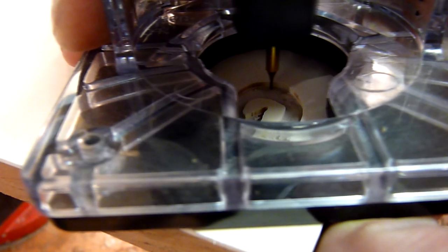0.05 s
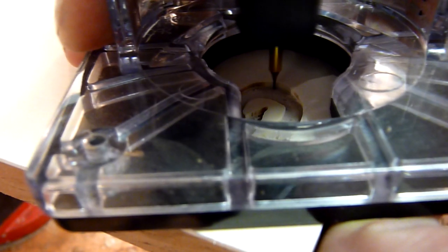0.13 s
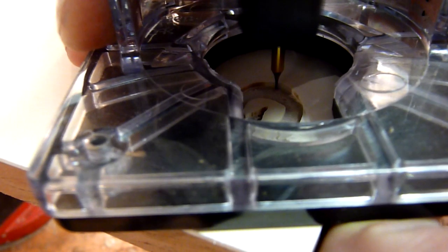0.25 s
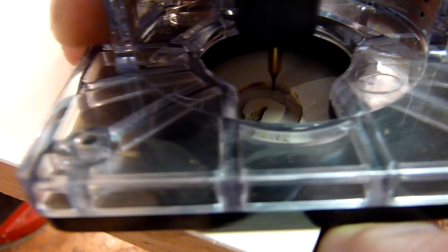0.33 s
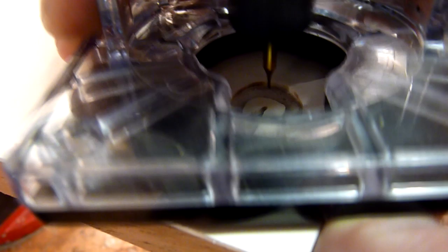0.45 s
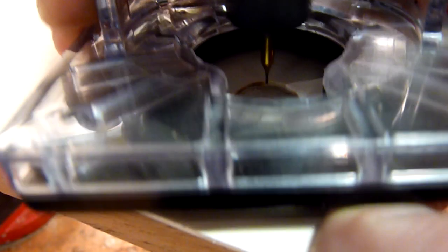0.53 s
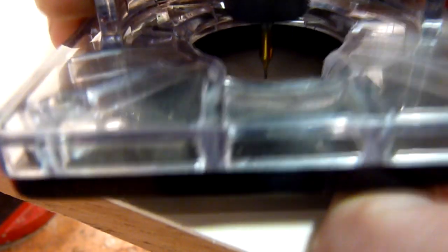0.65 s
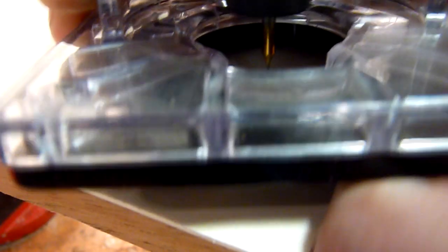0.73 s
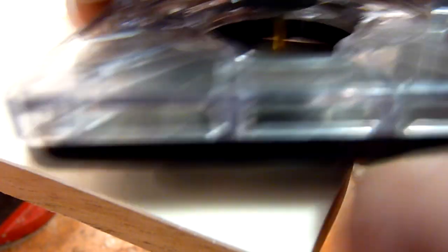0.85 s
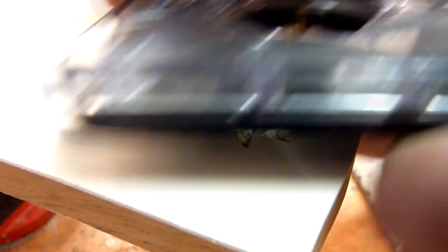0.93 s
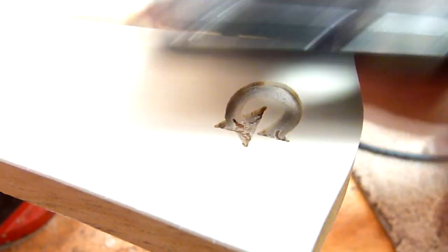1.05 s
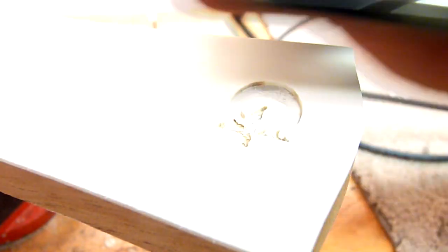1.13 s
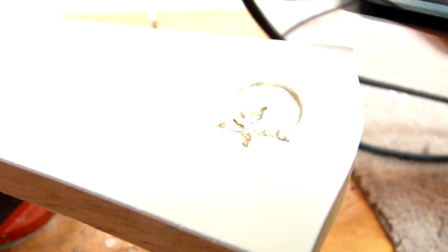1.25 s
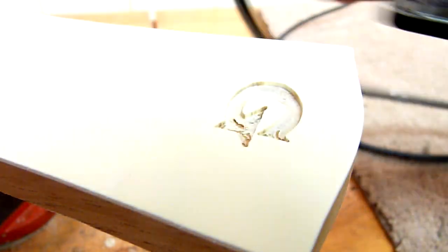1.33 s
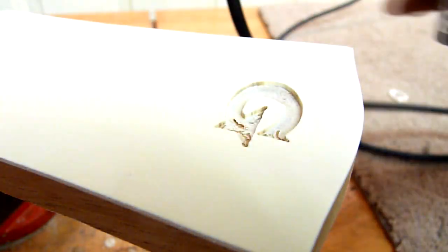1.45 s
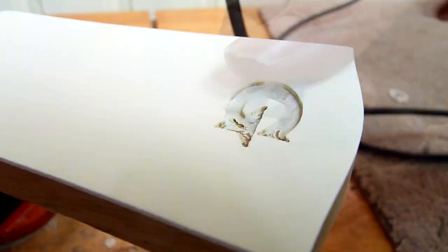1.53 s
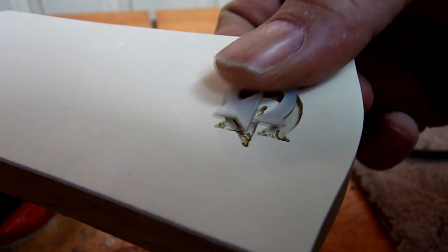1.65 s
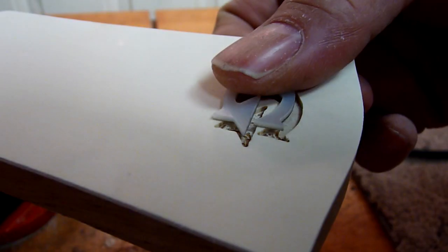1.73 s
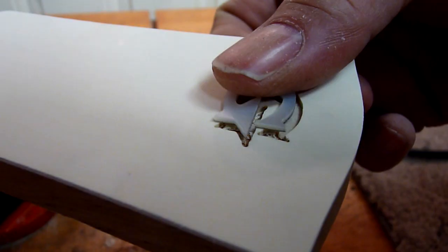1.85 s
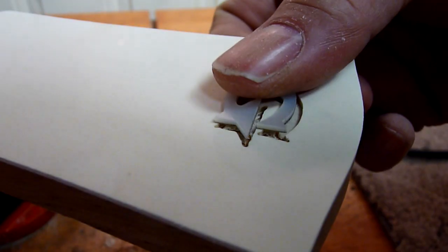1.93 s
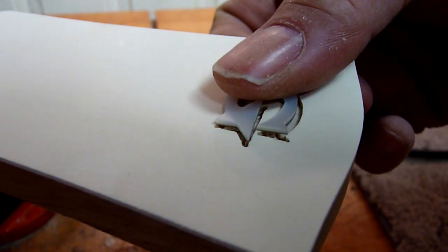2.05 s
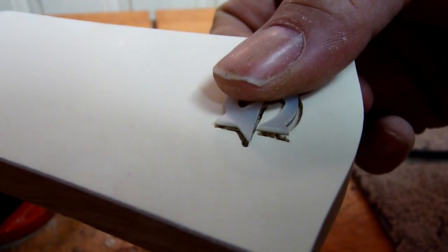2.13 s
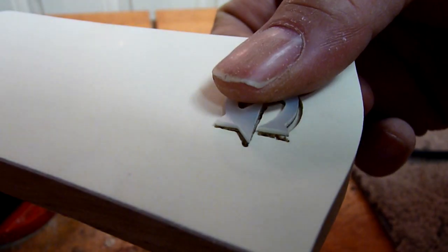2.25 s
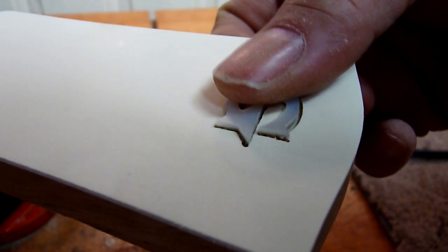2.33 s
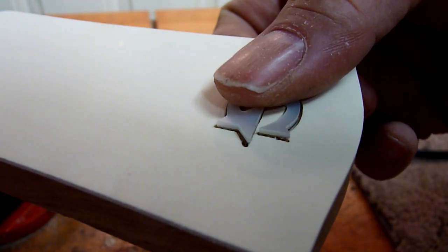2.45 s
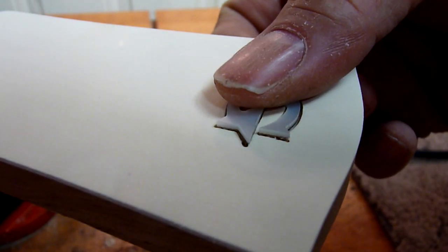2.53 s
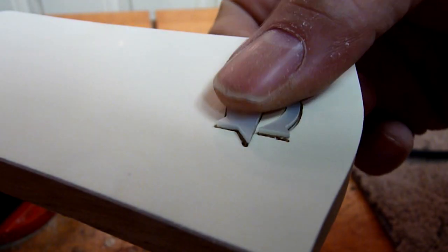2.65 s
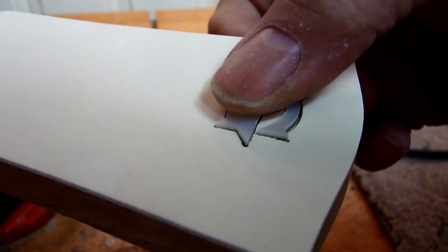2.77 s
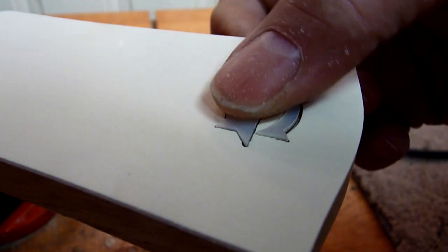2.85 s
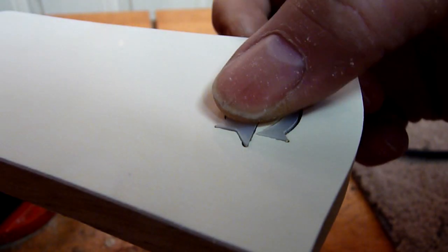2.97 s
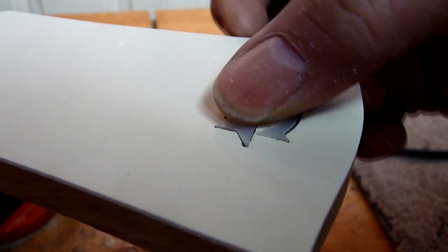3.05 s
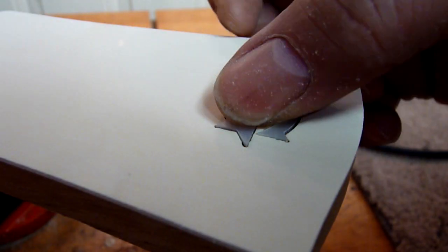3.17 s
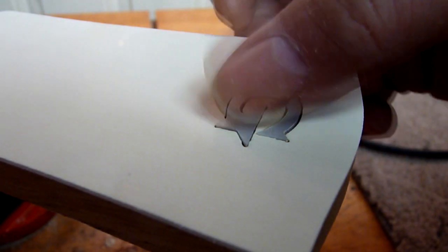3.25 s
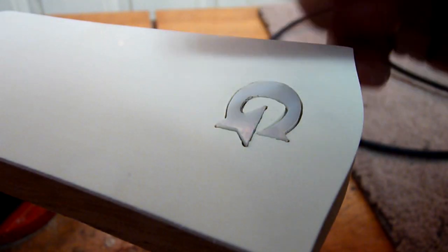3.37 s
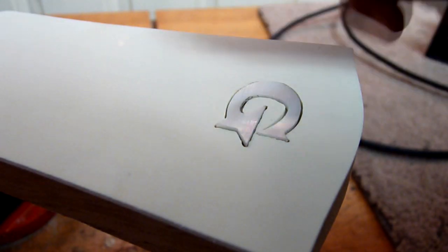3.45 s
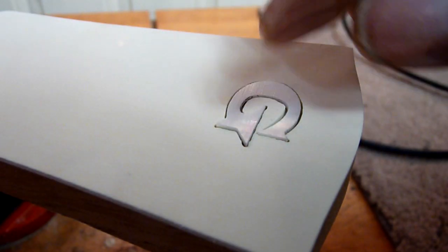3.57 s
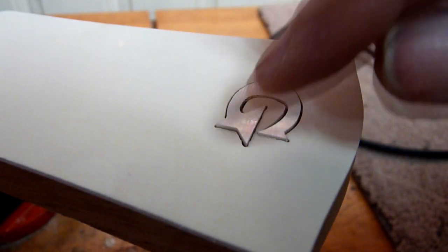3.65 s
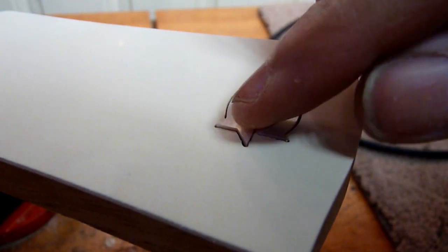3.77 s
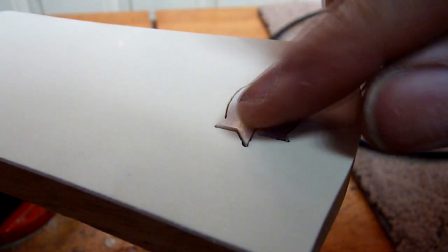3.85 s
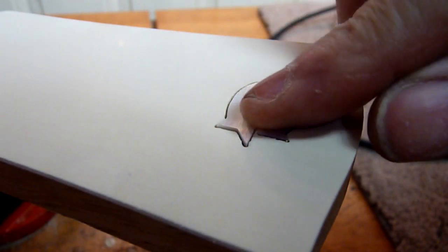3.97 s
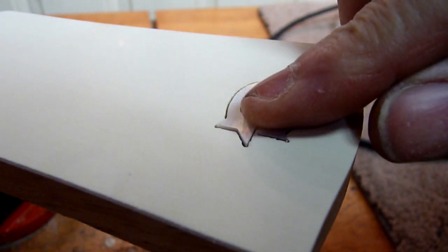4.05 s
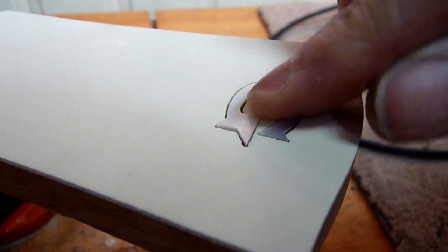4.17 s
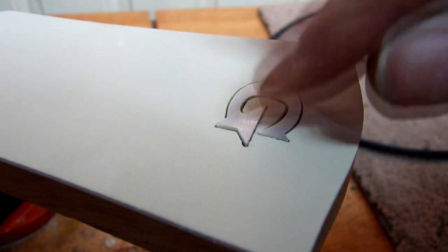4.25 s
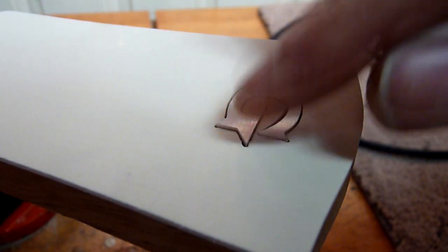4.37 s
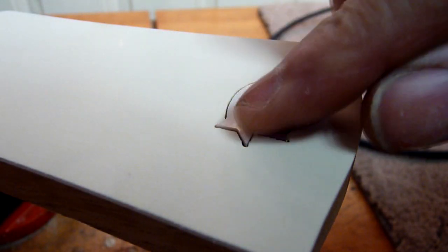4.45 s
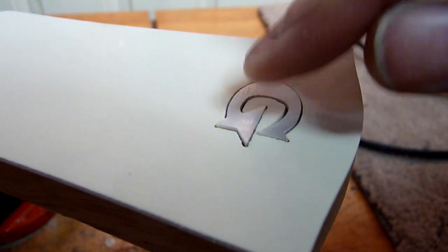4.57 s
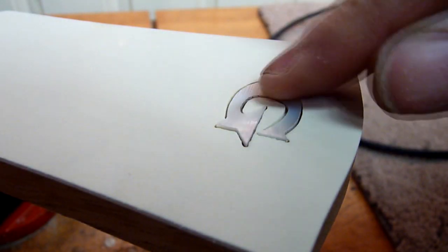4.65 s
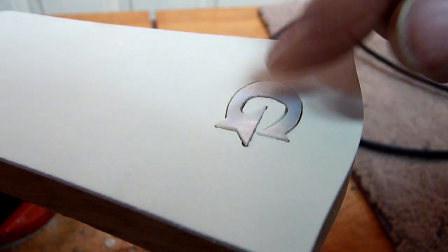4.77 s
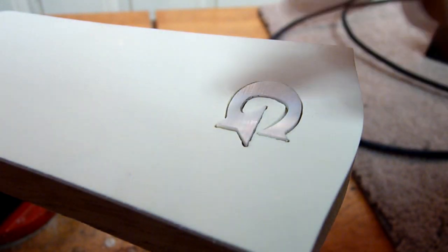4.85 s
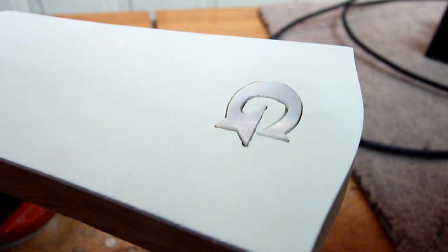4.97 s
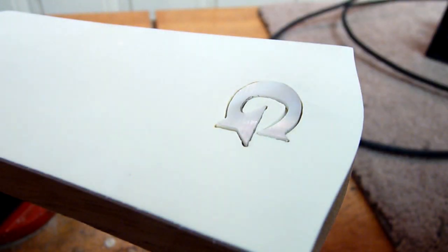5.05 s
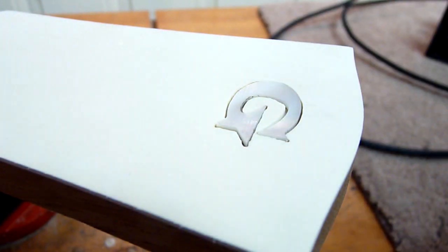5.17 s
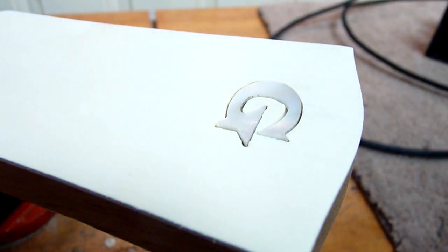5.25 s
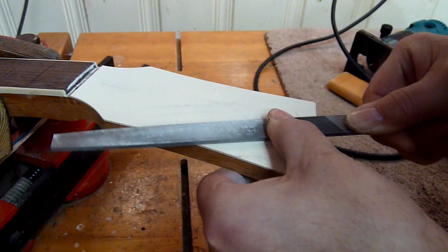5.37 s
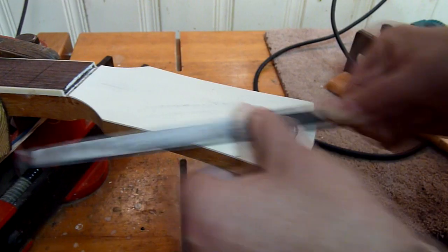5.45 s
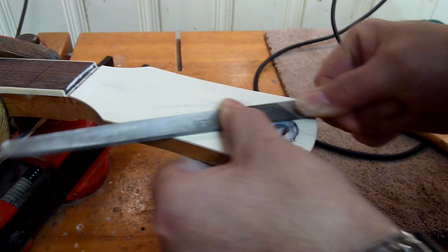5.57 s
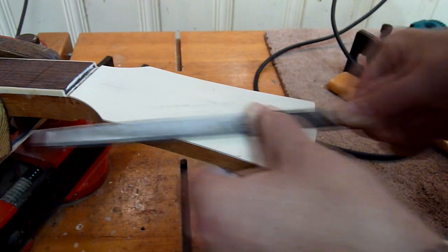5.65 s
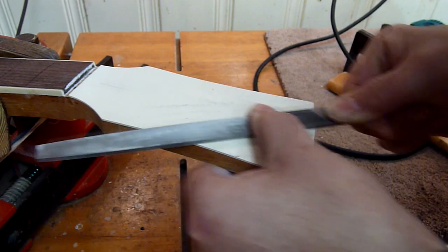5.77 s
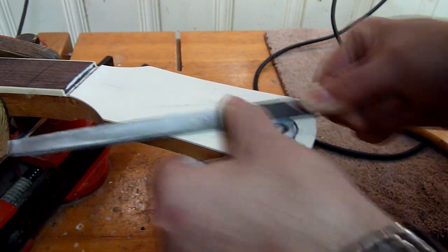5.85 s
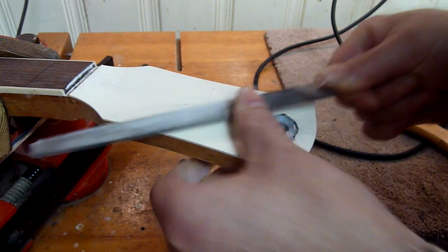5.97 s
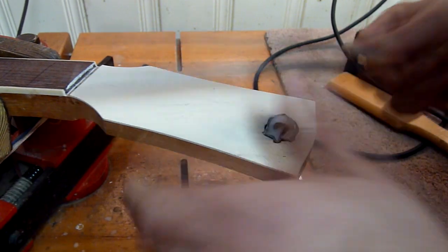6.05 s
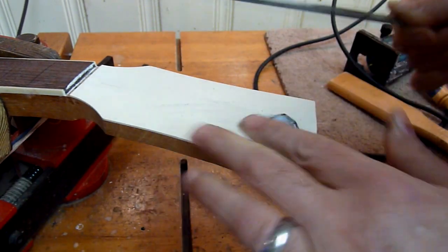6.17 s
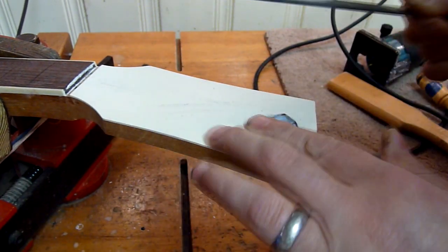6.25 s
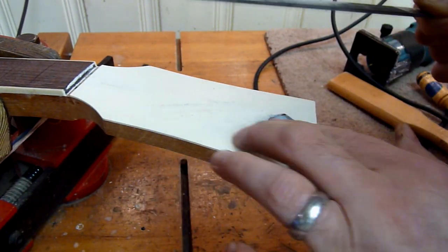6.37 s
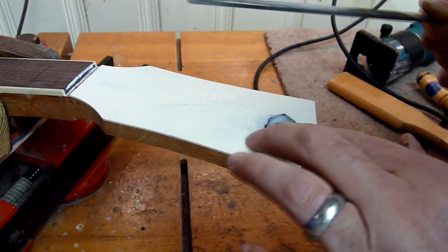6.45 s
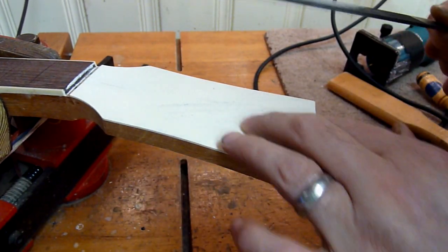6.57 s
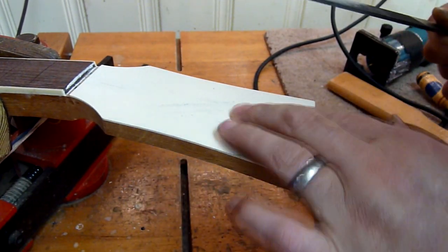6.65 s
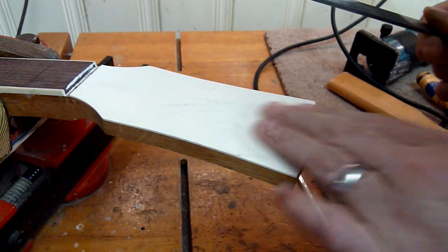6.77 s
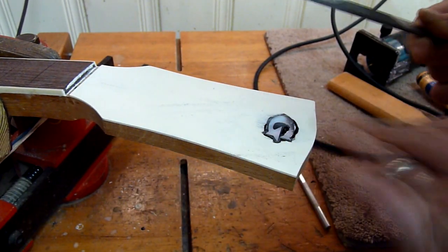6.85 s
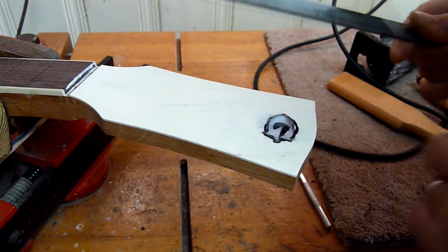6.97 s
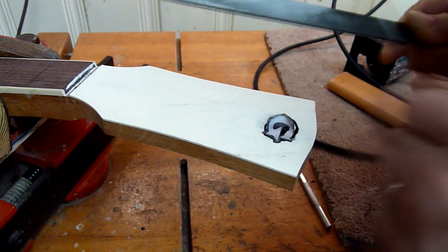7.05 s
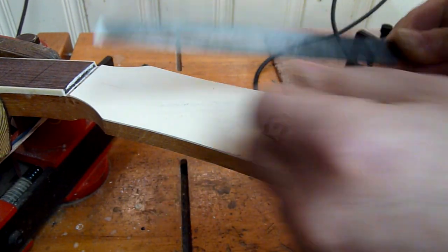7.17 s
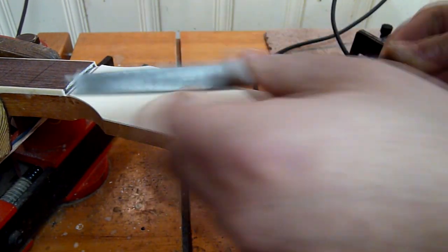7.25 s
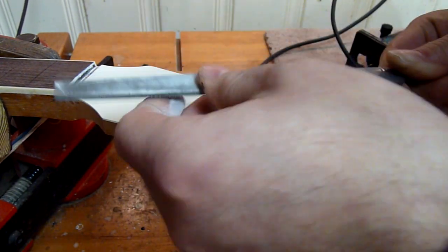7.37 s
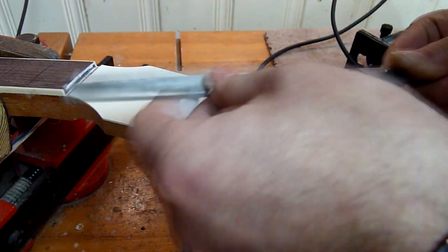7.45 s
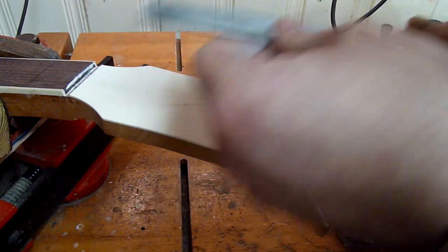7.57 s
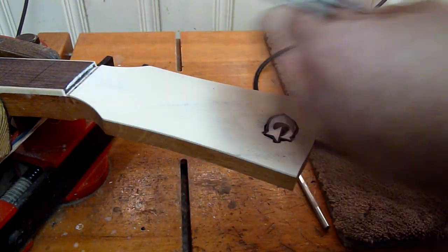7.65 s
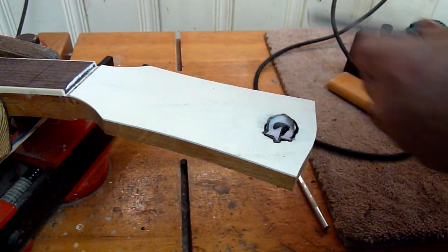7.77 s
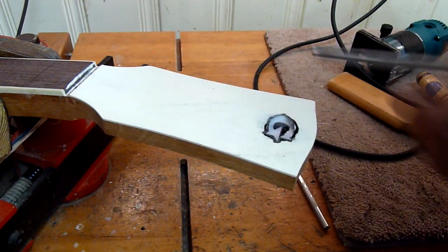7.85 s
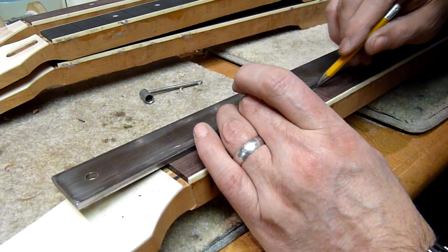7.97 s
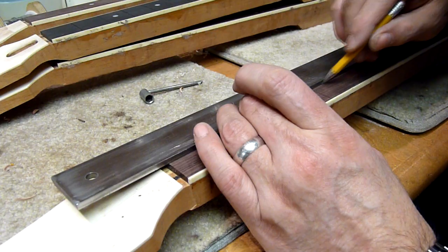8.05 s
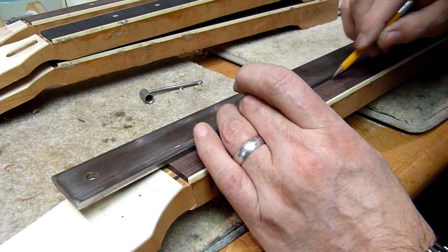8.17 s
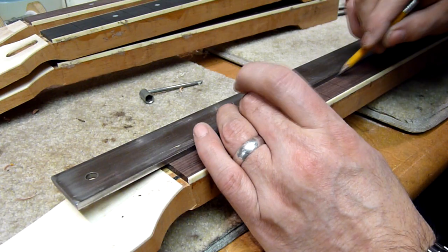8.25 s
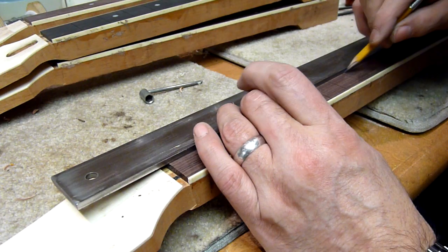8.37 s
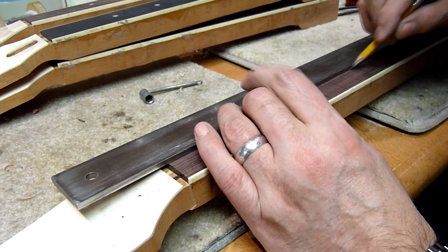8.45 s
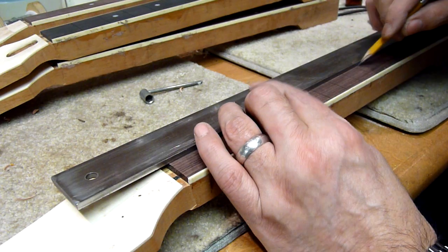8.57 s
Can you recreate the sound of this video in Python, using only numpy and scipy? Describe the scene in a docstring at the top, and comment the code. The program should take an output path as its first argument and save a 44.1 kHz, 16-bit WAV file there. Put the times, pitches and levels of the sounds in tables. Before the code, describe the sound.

Loud steady router whine and airy roar fade fast, followed by inlay clicks, soft rubbing, a few quick file rasps and faint handling knocks on wood.

```python
"""A small workshop in stereo, with hiss that is alike in the two microphones in the lows and mids but unrelated
in the treble, over low rumble and mains hum. First a small router whines on the wood, is lifted, moves right
and fades quickly; its motor coasts down. Then a thumb presses an inlay home with small clicks, made of noise
bursts and decaying modes; fingers slide over wood as soft hiss, a file takes strokes, a hand lightly brushes
the wood, and a pencil scratches once. The camera samples at 16 kHz, so the treble is mirrored, and it notches
out a few fixed bands."""
import sys
import numpy as np
from scipy import signal
from scipy.fft import rfft, irfft, next_fast_len
from scipy.io import wavfile
from scipy.ndimage import uniform_filter1d

SR = 44100
rng = np.random.default_rng(int(sys.argv[2]) if len(sys.argv) > 2 else 0)


def linear_from_db(decibels):
    """Turn decibels (scalar or array-like) into linear amplitude factors; 0 gives 1."""
    return 10 ** (np.asarray(decibels, float) / 20)


def transcribe(signal):
    """Save signal, clipped to [-1, 1], as a 16-bit WAV file at the path in sys.argv[1]."""
    frames = np.atleast_2d(signal).T
    limited = np.clip(frames, -1, 1)
    pcm = np.round(limited * 32767).astype(np.int16)
    wavfile.write(sys.argv[1], SR, pcm)


N = 379701
T = np.arange(N) / SR  # s


def evened(x):
    """Scales to an rms of one."""
    return x / np.sqrt(np.mean(x ** 2) + 1e-20)


def read(points, hz):
    """Reads a spectrum table on a log-frequency axis."""
    f, value = np.transpose(points)
    return np.interp(np.log(hz + 1), np.log(f + 1), value)


def curves(rows):
    """Columns of a table, joined by straight lines in time."""
    s, *columns = np.transpose(rows)
    return [np.interp(T, s, c) for c in columns]


def gate(rows, edge_s):
    """One while a table lasts, with soft edges."""
    inside = 1. * ((T > rows[0][0]) & (T < rows[-1][0]))
    return uniform_filter1d(inside, max(int(edge_s * SR), 1), mode="nearest")


def arch(start, length, share, power):
    """Swells from nothing to one at a share of the length, then sinks back."""
    top = start + np.clip(share, .02, .98) * length
    u = np.interp(T, [start, top, start + length], [0, .5, 1])
    return np.abs(np.sin(np.pi * u)) ** power * (u < 1)


def colour(x, points):
    """Filters by a spectrum table."""
    size = next_fast_len(N)
    gain = linear_from_db(read(points, np.fft.rfftfreq(size, 1 / SR)))
    return irfft(rfft(x, size) * gain, size)[..., :N]


def noise(points, same, patchy_db, lead=((1, 0), (2, 0))):
    """Two-channel noise in drifting patches; the channels are alike as far as the table says."""
    hz = np.fft.rfftfreq(1024, 1 / SR)
    a, b, c, d, patches = rng.standard_normal((N // 256 + 5, 513, 5)).T
    patches = evened(uniform_filter1d(uniform_filter1d(patches, 8, 0), 8, 1))
    like = np.clip(read(same, hz), -1, 1)[:, None]
    late = np.exp(-1j * read(lead, hz))[:, None]
    left = a + 1j * b
    right = like * late * left + np.sqrt(1 - like ** 2) * (c + 1j * d)
    z = np.array([left, right]) * linear_from_db(read(points, hz)[:, None] + patchy_db * patches)
    return evened(signal.istft(z, nperseg=1024, noverlap=768)[1][:, :N])


def resonate(x, hz, width):
    """Shifts the curve hz down to zero, smooths, and shifts back."""
    turn = np.exp(2j * np.pi * np.cumsum(hz * np.ones(N)) / SR)
    r = np.exp(-np.pi * width / SR)
    return evened((turn * signal.lfilter([1 - r], [1, -r], x / turn)).real)


def panned(x, db):
    """Shares a left-right level difference between the channels."""
    return x * linear_from_db(np.array([db / 2, -db / 2]).reshape(2, -1))


# shop background, steady in each stretch: (start [s], rumble [dB], hiss [dB], hum change [dB])
SHOP_STRETCHES = [(1.62, -55.5, -65, 0), (5.418, -52.5, -65, -1), (8.055, -55, -62, 0)]
# spectrum of the shop's rumble: (frequency [Hz], density [dB per Hz])
SHOP_RUMBLE = [(20, -49), (35, -23.5), (55, -12.5), (100, -2.5), (150, -12.5), (250, -5.5), (350, -12),
               (600, -17.5), (1000, -19), (1500, -26), (2300, -36), (3200, -59.5)]
# spectrum of the microphone hiss: (frequency [Hz], density [dB per Hz])
MICROPHONE_HISS = [(300, -3.5), (1000, 5.5), (2000, -4.5), (3500, -4), (5000, -6), (6500, -8.5),
                   (8000, -6.5), (9000, -36.5)]
# mains hum, before waver and stretch: (frequency [Hz], level [dB])
MAINS_HUM = [(59.6, -67), (119.5, -63)]
# left-right likeness of the shop: (frequency [Hz], likeness [-1 to 1])
SHOP_LIKENESS = [(120, .9995), (270, .99), (560, .93), (1180, .78), (2500, 0), (6000, -.05)]


def shop():
    """Low rumble and mains hum, nearly alike in both channels, under microphone hiss that is alike in the lows
    and mids and unrelated in the treble."""
    fade_s, dip_s = .12, .004
    start, *levels = np.transpose(SHOP_STRETCHES)
    stretch = np.maximum(np.searchsorted(start, T) - 1, 0)
    rumble_db, hiss_db, hum_db = (uniform_filter1d(db[stretch], 800) for db in levels)
    waver = rng.standard_normal((len(MAINS_HUM), N))
    waver = evened(uniform_filter1d(uniform_filter1d(waver, 6000), 6000))
    hum = sum(np.sqrt(2) * linear_from_db(db + 3.5 * w) * np.sin(2 * np.pi * hz * T + .4 * w)
              for (hz, db), w in zip(MAINS_HUM, waver))
    fade_in = np.clip(1 + (T - start[0]) / fade_s, 0, 1) ** 2.5
    # the background dips briefly where one stretch gives way to the next
    dips = np.prod([1 - 0.73 * np.exp(-((T - s) / dip_s) ** 2) for s in start[1:]], axis=0)
    rumble = linear_from_db(rumble_db) * noise(SHOP_RUMBLE, SHOP_LIKENESS, patchy_db=2.0)
    hiss = linear_from_db(hiss_db) * noise(MICROPHONE_HISS, SHOP_LIKENESS, patchy_db=1.5)
    return fade_in * dips * (rumble + linear_from_db(hum_db) * hum + hiss)


# finger slides on wood and, at 8.38 s, a short pencil scratch: (start [s], length [s],
# share of the length until the top [0-1], top level [dB], extra treble from a lighter touch [dB])
SLIDES_AND_SCRATCH = [(4.197, 0.122, .4, -62, 11), (4.55, 0.096, 0.36, -60.5, 6),
                      (4.79, .06, .35, -67, -3.5), (4.98, 0.41, 0.46, -54, 2.5),
                      (7.315, 0.057, 0.74, -64, 0), (7.917, .13, 0.94, -62.5, 3.5),
                      (8.383, 0.08, 0.43, -66.5, 5)]
# spectrum of slides and scratch: (frequency [Hz], density [dB per Hz])
SLIDE_SPECTRUM = [(500, 9), (1200, 6), (2500, -0.5), (4000, 2.5), (6000, 3.5), (7500, -2.5), (8500, -6),
                  (9500, -30)]
# left-right likeness of slides, motor and router: (frequency [Hz], likeness [-1 to 1])
TOOL_LIKENESS = [(300, .9995), (600, .99), (1200, .96), (2500, .82), (5000, .85), (9000, .72)]


def slides_and_scratch():
    """Fingers slide on wood, and a pencil scratches once: soft, even friction hiss."""
    friction = noise(SLIDE_SPECTRUM, TOOL_LIKENESS, patchy_db=1.2)
    treble = signal.sosfilt(signal.butter(4, 5500, "high", fs=SR, output="sos"), friction)
    return sum(arch(*when, power=1) * linear_from_db(db) * (friction + (linear_from_db(extra_db) - 1) * treble)
               for *when, db, extra_db in SLIDES_AND_SCRATCH)


def bench(x, wet_db, t60):
    """Near reflections that differ per microphone port, more so in the treble."""
    t = np.arange(SR // 4) / SR
    sparse = rng.standard_normal((2, len(t))) * (rng.random((2, len(t))) < .06)
    tail = sparse * linear_from_db(-60 * t / t60) * (t > .0008)
    tail = signal.lfilter(*signal.butter(1, 1800, "high", fs=SR), tail)
    tail = tail / np.linalg.norm(tail[0])
    return x + linear_from_db(wet_db) * signal.fftconvolve(x, tail, axes=1)[:, :N]


# taps: (time [s], crack level [dB], knock level [dB], best-excited knock [Hz], best-excited crack [Hz])
TAP_EVENTS = [(2.4448, -34.5, -31, 900, 6030), (2.8215, -40, -45, 1450, 4300),
              (2.8701, -46.5, -36, 646, 3770), (3.34, -52, -54, 773, 4200), (4.4836, -50, -42, 650, 3450),
              (4.7116, -37, -42, 680, 4160), (5.3838, -75, -43.5, 597, 3740), (5.4246, -34, -39, 571, 6400),
              (6.044, -41, -48, 970, 6800), (6.0936, -36.5, -57, 660, 7700), (6.1942, -46, -56, 552, 3890),
              (6.2603, -43.5, -52, 624, 3680), (6.2991, -45, -57, 861, 3210), (6.4667, -54, -53, 743, 6300),
              (6.5782, -56, -56, 910, 5850), (6.9078, -37, -42, 2200, 5950), (6.9748, -49, -59, 915, 3080),
              (8.2166, -39, -46, 1420, 4170), (8.4253, -53, -47.5, 1780, 5960)]
# knock modes of the board: (frequency [Hz], level [dB], decay by 60 dB [s])
KNOCK_MODES = [(620, -2, .045), (975, -5, .1), (1420, -2, .045), (1790, -1, .055), (2200, -3, .045)]
# thump modes of the bench: (frequency [Hz], level [dB], decay by 60 dB [s])
THUMP_MODES = [(208.3, 0.5, 0.2), (358.6, -10, 0.066)]
# blows heavy enough to thump the bench: (time [s], level [dB])
HEAVY_BLOWS = [(2.4444, -62.5), (2.8235, -52.5), (4.4816, -50.5), (4.7096, -38), (6.0928, -53),
               (6.1942, -60), (6.2608, -44.5), (6.299, -45.5), (6.9061, -35.5), (6.9753, -37.5),
               (8.4253, -54.5)]


def taps():
    """A crack, a dry clack, the board's knock and the bench's thump; the spot struck favours some modes."""
    out, t = np.zeros(N + SR), np.arange(SR // 3) / SR
    puffs = rng.standard_normal((len(TAP_EVENTS), len(t)))
    cracks = signal.lfilter(*signal.butter(2, 2400, "high", fs=SR), puffs)
    clacks = evened(signal.lfilter(*signal.butter(2, [230, 2300], "band", fs=SR), puffs))
    rise = 1 - np.exp(-t / .0004)
    for (s, crack_db, knock_db, knock_hz, crack_hz), crack, clack in zip(TAP_EVENTS, cracks, clacks):
        # modes lose 11 dB per octave away from the best-excited one
        knock = sum(linear_from_db(db - 11 * abs(np.log2(hz / knock_hz)) - 60 * t / t60) * np.sin(2 * np.pi * hz * t)
                    for hz, db, t60 in KNOCK_MODES)
        # the first blunt contact
        push = np.sin(2 * np.pi * 0.76 * knock_hz * t) * np.exp(-t / 0.00091)
        clack = .4 * clack + 1.3 * signal.lfilter(*signal.iirpeak(knock_hz, 1.5, SR), clack)
        knock = knock + clack * linear_from_db(-2 - 60 * t / 0.046) + linear_from_db(2.5) * push
        tinted = .3 * crack + 4 * signal.lfilter(*signal.iirpeak(crack_hz, 8, SR), crack)
        # a short crack with a fainter, longer tail
        bright = tinted * (linear_from_db(-60 * t / .014) + linear_from_db(-21 - 60 * t / .07))
        at = round(s * SR)
        out[at:at + len(t)] += rise * (linear_from_db(crack_db) * bright + linear_from_db(knock_db) * knock)
    thump = rise * sum(linear_from_db(db - 60 * t / t60) * np.sin(2 * np.pi * hz * t) for hz, db, t60 in THUMP_MODES)
    for s, db in HEAVY_BLOWS:
        out[round(s * SR):][:len(t)] += linear_from_db(db) * thump
    return out[:N]


# file strokes on wood, then from about 6.1 s a hand lightly brushing the wood: (start [s], length [s],
# share of the length until the top [0-1], top level [dB], ring of the steel modes against the rasp [dB])
STROKES_AND_BRUSHING = [(5.42, 0.042, 0.12, -40.5, -20), (5.458, 0.18, 0.47, -39, -4),
                        (5.618, .18, 0.57, -39, -16), (5.784, 0.21, 0.38, -41, -6.5),
                        (5.967, 0.13, 0.4, -51, -16), (6.09, 0.13, .15, -63, -20),
                        (6.186, .06, .2, -62, -14), (6.239, 0.14, 0.12, -59.5, -9),
                        (6.373, 0.089, .3, -62.5, -14), (6.447, .1, .15, -62.5, -10),
                        (6.569, 0.2, 0.43, -61.5, -10), (6.771, .17, 0.77, -51, -32),
                        (6.929, 0.079, .2, -63, -10)]
# spectrum of the rasp: (frequency [Hz], density [dB per Hz])
RASP_SPECTRUM = [(1500, -8.5), (2500, -4), (3500, -1), (5000, -2), (6500, 0), (7500, -7.5), (8500, 4),
                 (9500, -57)]
# rings of the file's steel: (frequency [Hz], width [Hz], level [dB])
STEEL_RINGS = [(3760, 100, -3), (5140, 160, -11), (5860, 200, -11), (6750, 200, -9)]
# rings of the board: (frequency [Hz], width [Hz], level [dB])
BOARD_RINGS = [(290, 130, -9), (580, 100, -1), (780, 200, -7), (1300, 150, 0), (1510, 90, -7),
               (1830, 170, 2), (2200, 180, -12)]
# rings of the board's free end: (frequency [Hz], width [Hz], level [dB])
END_RINGS = [(980, 130, -2), (370, 90, -7)]


def filing_and_brushing():
    """A file, then faintly a hand, rubs the wood: dense uneven clicks in drifting rings of steel and board."""
    catches_per_s, roundness = 2800, 1.16  # roundness: power of the arch, small = flat top
    board_db, end_db = 0.5, -12  # rings of the board and of its free end
    board_lag_s, board_power, firm_db = 0.0096, 1.3, -41
    arches = [arch(*when, roundness) * linear_from_db(db) for *when, db, _ in STROKES_AND_BRUSHING]
    pressure = sum(arches)
    singing = sum(a * linear_from_db(row[-1]) for a, row in zip(arches, STROKES_AND_BRUSHING))
    # the board's ring builds late and grows faster than the rasp around a firm stroke
    hold = np.exp(-1 / (board_lag_s * SR))
    built = np.abs(signal.lfilter([1 - hold], [1, -hold], pressure / linear_from_db(firm_db)))
    ringing = linear_from_db(firm_db) * built ** board_power
    # the file slips off the free end and sets it ringing: start [s], length [s], share [0-1]
    slip = arch(6, 0.09, 0.1, roundness) * linear_from_db(-45)
    catches = (rng.random(N) < catches_per_s / SR) * linear_from_db(4.4 * np.minimum(rng.exponential(1, N), 4))
    drive = evened(catches * rng.choice([-1, 1], N)) + 0.79 * rng.standard_normal(N)
    # the moving contact: two slow curves for each of the 13 rings, for pitch and level
    contact = evened(uniform_filter1d(rng.standard_normal((N // 512 + 1, 26)), 7, 0))
    contact = iter(uniform_filter1d(contact.repeat(512, 0)[:N].T, 512))

    def ring(hz, width, db):
        """One ring that drifts in pitch, swells and sinks."""
        hz = hz * (1 + .012 * next(contact))
        return linear_from_db(db + 2.5 * next(contact)) * resonate(resonate(drive, hz, width), hz, width)

    steel, board, end = (sum((-1) ** k * ring(*mode) for k, mode in enumerate(modes))
                         for modes in (STEEL_RINGS, BOARD_RINGS, END_RINGS))
    rasp = pressure * evened(colour(drive, RASP_SPECTRUM)) + singing * steel
    return rasp + ringing * linear_from_db(board_db) * evened(board) + (pressure * linear_from_db(end_db) + slip) * end


# the coasting motor fades: (time [s], level of its air hiss [dB])
COAST_FADE = [(1.58, -64), (1.72, -50), (1.87, -54), (2.2, -59.5), (2.5, -65.5), (2.7, -85)]
# spectrum of the coasting motor's air: (frequency [Hz], density [dB per Hz])
COAST_SPECTRUM = [(300, -11), (800, 7), (1600, -4.5), (2600, -2), (3400, -1), (5000, 0), (6500, -1.5),
                  (8000, -3), (9000, -32)]
# whines that fall with speed: (frequency at speed one [Hz], width [Hz], level at speed one [dB])
FALLING_WHINES = [(1900, 40, -9), (3750, 70, -10), (4300, 70, -13), (5400, 80, -12)]


def coasting():
    """The switched-off motor slows: fuzzy whines slide down past a fixed housing ring."""
    from_s, slowing_per_s = 1.72, .85  # speed is one at from_s and decays at this rate
    level_db = curves(COAST_FADE)[0]
    speed = np.exp(-slowing_per_s * np.clip(T - from_s, -.3, 2))
    air = noise(COAST_SPECTRUM, TOOL_LIKENESS, patchy_db=.6)
    whines = sum(linear_from_db(db) * speed ** 2 * resonate(air, hz * speed, width) for hz, width, db in FALLING_WHINES)
    ring = linear_from_db(-8) * resonate(air, hz=2150, width=40)  # steady ring of the housing
    return panned(linear_from_db(level_db) * (air + whines + ring), -2.5) * gate(COAST_FADE, .05)


# the router is tipped and lifted, moves right, then fades out quickly from 1.6 s:
# (time [s], level [dB], lift [0 = on the wood, 1 = clear of it])
LIFT_AND_FADE = [(0, -0.5, 0.11), (.5, 0, 0.13), (1.0, 0.5, 0.76), (1.11, -.5, 0.81), (1.199, -3.5, 0.94),
                 (1.36, -6, 0.83), (1.6, -8, 0.78), (1.67, -13, 0.7), (1.76, -38.5, 0.2)]
# speed of the shaft: (time [s], speed [turns per s])
SHAFT_SPEED = [(0, 522.6), (1.76, 523.1)]
# other orders of the shaft: (multiple of its speed [1], level against the shaft tone [dB])
SHAFT_MULTIPLES = [(2, -10), (3, -14), (4, -13), (7, -15), (11, -17), (12, -11)]
# spectrum of the shaking bench: (frequency [Hz], density [dB per Hz])
BENCH_SPECTRUM = [(20, -37), (45, -6.5), (100, -8), (200, 2), (300, 1.5), (420, -34.5), (600, -61.5)]
# spectrum of the housing roar: (frequency [Hz], density [dB per Hz])
ROAR_SPECTRUM = [(200, -33), (300, -21), (450, -13.5), (600, -11.5), (700, -2), (950, -1), (1300, -4),
                 (1900, -2.5), (2400, -5), (3200, -35.5)]
# spectrum of the cooling air: (frequency [Hz], density [dB per Hz])
AIR_SPECTRUM = [(1800, -36), (2600, -8.5), (3500, -0.5), (4500, -1.5), (5500, -6.5), (6500, -6.5),
                (7500, -3), (8200, -7), (9000, -54)]
# phase of the left channel ahead of the right: (frequency [Hz], lead [radians])
LEFT_LEAD = [(500, 0.033), (2000, 0.42), (4000, 0.7), (6500, -.3)]


def router():
    """Shaft orders and the fan's blade tone stand as clean lines in housing roar and cooling air."""
    blades = 8
    ripple_hz, ripple = 120, .22  # mains ripple in the torque puts side tones by the shaft tone
    tones_fade = .35  # the tones beam forward and lose this many dB more per dB of fading
    level_db, lift = curves(LIFT_AND_FADE)
    lift = np.clip(lift, 0, 1.2)

    def lifted(on_wood_db, change_db, power):
        """Level on the wood plus the change when lifted; a high power changes late."""
        return on_wood_db + lift ** power * change_db

    whine_db = lifted(-30.5, 0.5, 1) + (1 + tones_fade) * level_db
    shaft_db = lifted(-36, -7.5, 2.5) + (1 + tones_fade) * level_db
    overtone_db = lifted(-49, 15, 2) + level_db
    roar_db = lifted(-27, -4, 0.8) + level_db
    air_db = lifted(-29.5, 4, 0.64) + level_db
    rumble_db = lifted(-57, -16, 3.5)  # the bench shakes until the base leaves the wood
    # left against right: moves to the right as the level falls, up to a limit
    pan_db = np.maximum(-4 + 1.4 * level_db, -10.5)

    turn = 2 * np.pi * np.cumsum(curves(SHAFT_SPEED)[0]) / SR
    lag = np.array([[0], [1]])  # phase offsets apply to the right channel only
    waver = evened(uniform_filter1d(uniform_filter1d(rng.standard_normal((3, N)), 900), 900))
    orders = sum(linear_from_db(db) * np.sin(k * turn + k - .5 * lag) for k, db in SHAFT_MULTIPLES)
    torque = 1 + ripple * np.sin(2 * np.pi * ripple_hz * T)
    shaft = panned(torque * np.sin(turn - 0.12 * lag), .3 * pan_db) + panned(orders, .7 * pan_db)
    shaft = linear_from_db(shaft_db + 0.87 * waver[2]) * shaft
    whine = panned(linear_from_db(whine_db + 0.71 * waver[0]) * np.sin(blades * turn - .4 * lag), .4 * pan_db)
    overtone = panned(linear_from_db(overtone_db + waver[1]) * np.sin(2 * blades * turn + .5 * lag), pan_db)
    rumble = linear_from_db(rumble_db) * noise(BENCH_SPECTRUM, TOOL_LIKENESS, patchy_db=4.2)
    roar = panned(linear_from_db(roar_db) * noise(ROAR_SPECTRUM, TOOL_LIKENESS, 0.78, LEFT_LEAD), 0.19 * pan_db)
    air = panned(linear_from_db(air_db) * noise(AIR_SPECTRUM, TOOL_LIKENESS, 0.96, LEFT_LEAD), pan_db)
    tones = np.sqrt(2) * (shaft + whine + overtone)
    return (tones + rumble + roar + air) * gate([(-1,), LIFT_AND_FADE[-1]], .03)


def scene():
    """All sources of the shop; filing, brushing and taps also reflect off what is near them."""
    handwork = bench(np.ones((2, 1)) * (filing_and_brushing() + taps()), wet_db=-7.5, t60=0.12)
    return shop() + slides_and_scratch() + handwork + coasting() + router()


def band_limit(x):
    """A steep low-pass at the top of the band."""
    return signal.sosfilt(signal.butter(12, 12300, fs=SR, output="sos"), x)


# bands the camera takes out: (frequency [Hz], width [Hz])
CAMERA_NOTCHES = [(2606, 656), (4608, 846), (5426, 310), (7903, 560)]
# the camera's smoothing filter: (frequency [Hz], gain [dB])
CAMERA_SMOOTHING = [(30, -10), (50, 1.5), (6000, 1), (7000, -0.5), (7600, -6), (8400, -9.5), (9500, -13.5),
                    (10500, -26.5), (11800, -34.5), (12600, -50), (13500, -110)]


def record(dry):
    """Slow sampling mirrors bands about half the rate, notches included; then a gentle smoothing filter."""
    camera_hz = 16000
    size = next_fast_len(N + SR)
    hz_axis = np.fft.rfftfreq(size, 1 / SR)
    mirrored = dry * (1 + 2 * np.cos(2 * np.pi * camera_hz * T))
    z = rfft(mirrored, size)
    for hz, width in CAMERA_NOTCHES:
        notch = signal.iirnotch(hz, hz / width, camera_hz)
        z = z * signal.freqz(*notch, hz_axis, fs=camera_hz)[1]
    mix = colour(irfft(z, size)[:, :N], CAMERA_SMOOTHING)
    return band_limit(mix)


dry = scene()
out = record(dry)
transcribe(out)
```